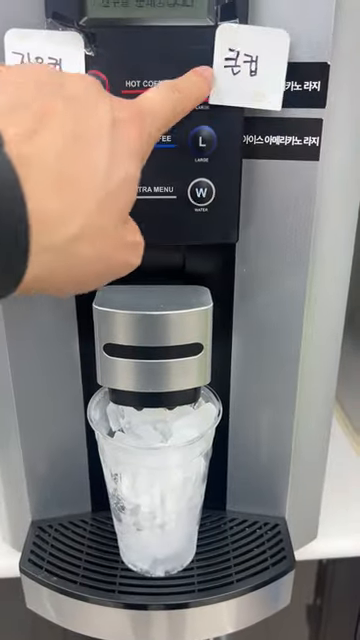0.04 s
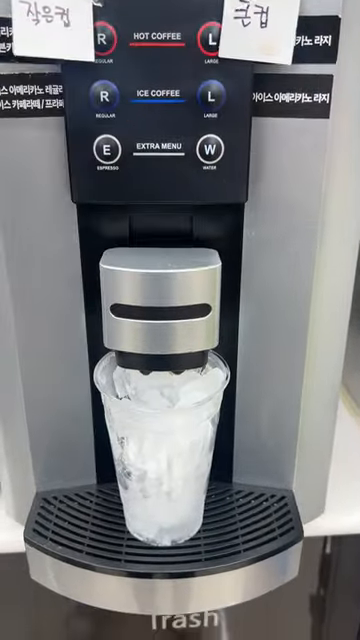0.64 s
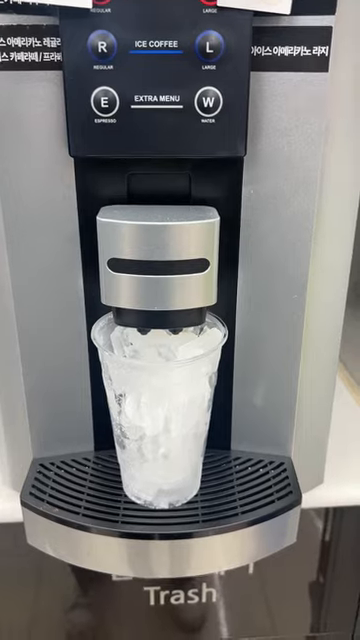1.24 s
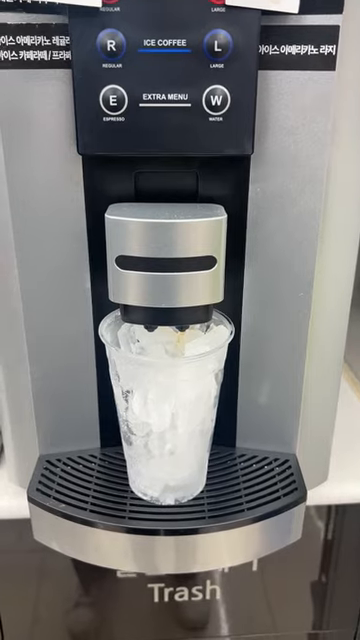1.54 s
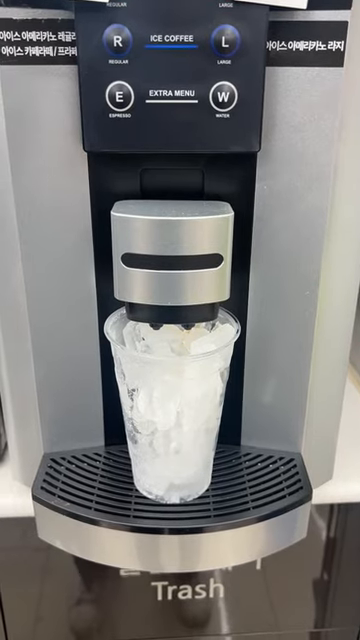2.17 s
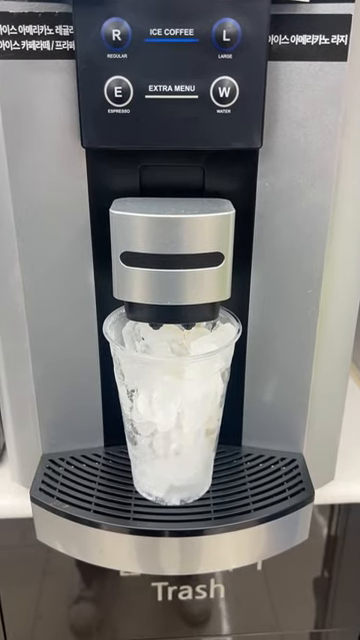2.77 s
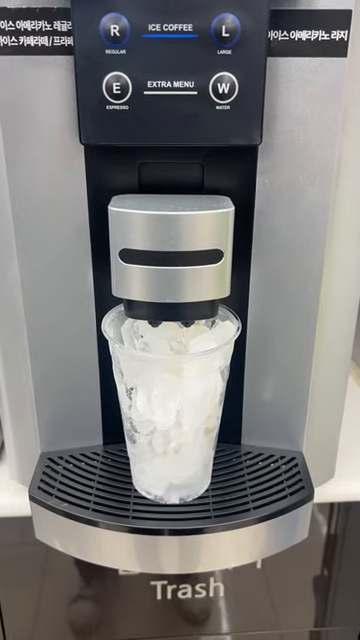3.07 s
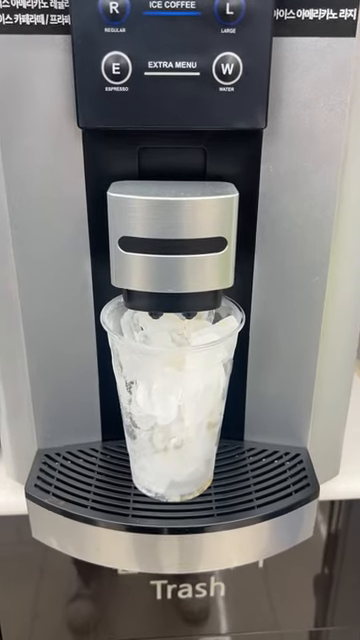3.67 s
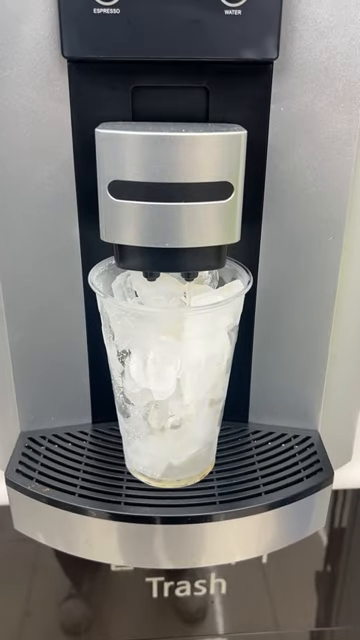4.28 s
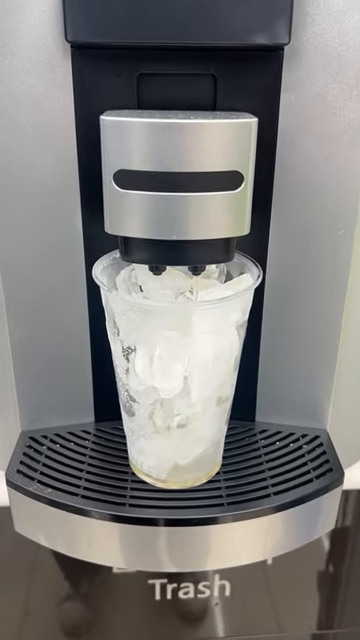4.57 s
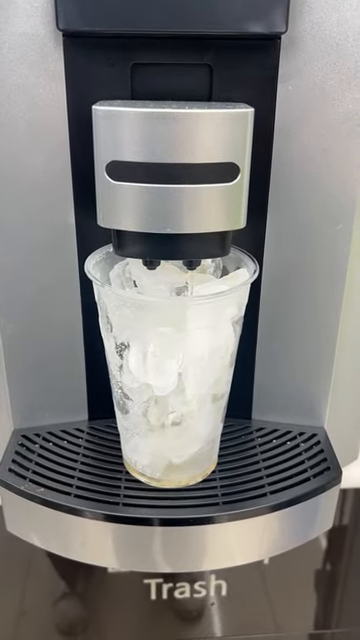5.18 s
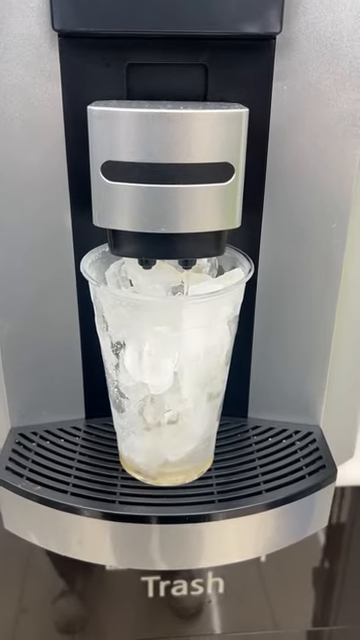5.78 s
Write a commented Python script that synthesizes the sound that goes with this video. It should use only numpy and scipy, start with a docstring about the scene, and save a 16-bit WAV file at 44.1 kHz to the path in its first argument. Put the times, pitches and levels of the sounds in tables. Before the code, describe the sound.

A coffee machine hums and hisses while filling a cup of ice, which cracks faintly, and something bangs twice farther off.

```python
"""Coffee dispensed over ice.

A coffee machine hums, churns and hisses as it fills a plastic cup of ice, close to the microphone.
A small motor whines with a wandering pitch. The ice cracks, fizzes and clinks once in the coffee.
Farther off something heavy, like a door or a lid, bangs twice and the shop answers."""
import sys
import numpy as np
from scipy.fft import rfft, irfft, next_fast_len
from scipy.io import wavfile
from scipy.ndimage import map_coordinates

SR = 44100
rng = np.random.default_rng(int(sys.argv[2]) if len(sys.argv) > 2 else 0)


def materialize(psi):
    """Save the field psi as 16-bit PCM at rate SR to the path in sys.argv[1].

    A 1-D psi becomes a single channel; in a 2-D psi each row is a channel.
    """
    bounded = np.clip(np.atleast_2d(psi).T, -1, 1)
    quanta = np.round(bounded * 32767).astype(np.int16)
    wavfile.write(sys.argv[1], SR, quanta)


N = 256662

# Noise spectra. Each row: frequency in Hz, relative density in dB.
RUMBLE_SPECTRUM = [(20, -21), (35, -23), (48, -3), (65, -4), (100, -4), (170, -1), (260, -2), (400, -11.5),
                   (900, -29.5), (2000, -84)]
CHURN_SPECTRUM = [(100, -65), (250, -9.5), (340, 1.5), (480, -2.5), (700, -0.5), (800, -7.5), (1000, -16.5),
                  (1250, -14), (1550, -24.5), (2200, -19), (5000, -76)]
HISS_SPECTRUM = [(300, -21), (1000, 5.5), (1550, -7.5), (1850, -2.5), (2300, -0.5), (2850, -3.5),
                 (3300, -2), (3900, -4), (4500, -1), (5300, -4.5), (5700, -1.5), (6300, -1), (6600, -4.5),
                 (7100, -3), (7500, -3.5), (8000, -2), (8400, -4.5), (9500, -6.5), (13300, -6.5),
                 (16000, -14)]
THUD_SPECTRUM = [(30, -26), (80, -15), (150, 0.5), (300, -1.5), (480, -2), (700, -3), (1100, -3.5),
                 (1400, -15), (1700, -31), (3000, -48), (8000, -57)]
CLATTER_SPECTRUM = [(200, -20), (800, -2), (1600, 0), (2600, -1), (4000, -4.5), (5300, -2), (8000, -13.5),
                    (12000, -15), (16000, -50)]
CRACK_SPECTRUM = [(300, -2), (900, 6), (1500, -1), (2200, 9.5), (3000, 7.5), (4700, -2), (6000, 0),
                  (7300, -3.5), (8200, -11), (12000, -4.5), (16000, -22)]
FIZZ_SPECTRUM = [(1000, -20), (4000, -5), (6000, 0.5), (8000, 2), (10000, -4.5), (16000, -11.5)]
# Stereo width. Each row: frequency in Hz, side minus mid in dB.
STEREO_WIDTH = [(60, -40), (110, -23), (200, -43), (380, -9), (650, -2.5), (900, 2), (1250, -1.5),
                (1800, -4.5), (2400, 2.5), (2950, 3), (3500, -2), (4250, -4), (5050, 3), (5700, -6.5),
                (6700, -27), (7800, -8), (9800, -0.5), (12000, 5.5), (13500, 38)]
# Microphone balance. Each row: frequency in Hz, left minus right in dB.
MIC_BALANCE = [(130, 0), (330, -2.5), (550, 0.8), (1000, 3.1), (3000, 0)]

# Blows within the two bangs. Each row: start in seconds, thud in dB, clatter in dB,
# thud rise in seconds, T60 in seconds, note in Hz, note in dB re the thud.
BLOWS = [(0, -28, -33.5, 0.0036, 0.77, 478, -8), (0.016, -27, -34, 0.0027, 0.24, 224.7, -7),
         (2.478, -23.5, -37, .009, 0.67, 590, -9), (2.506, -17.5, -27, .003, 0.11, 648, -5),
         (2.513, -24, -33, 0.0028, 0.073, 1060, -2.5), (2.523, -22, -39, 0.0043, 0.15, 307, 6.5),
         (2.527, -25, -46, 0.0025, 0.12, 465, 6), (2.54, -19.5, -43, 0.0026, 0.076, 242, 4),
         (2.586, -30.5, -49, .004, 0.34, 558, -4), (2.719, -27.5, -45, 0.0037, 0.15, 260, -2),
         (2.745, -29.5, -44, .003, 0.16, 590, -2.5)]
# Latch clacks. Each row: start in seconds, level in dB, T60 in seconds.
LATCH_CLACKS = [(0, -33, 0.37), (.028, -35.5, 0.3), (2.519, -39, .15)]
# Modes of the struck hollow body and the latch. Each row: frequency in Hz, width in Hz, gain in dB.
BODY_RESONANCES = [(145, 23, 5), (220, 59, 3), (298, 34, 4), (450, 130, 3.5), (680, 120, -2),
                   (846, 23, -1.5), (1155, 18, -1), (1390, 29, 1), (1560, 20, 15)]
LATCH_RESONANCES = [(1270, 120, -9), (1590, 88, 0), (1830, 140, -7), (4100, 110, -8), (4870, 150, -6.5)]

# Mains and motor lines. Each row: frequency in Hz, level in dB, sway in dB.
HUM_LINES = [(46.9, -56.5, -1), (59.8, -46.5, 3.5), (73.8, -49.5, 3), (93.7, -44, 3), (119.37, -32, 1),
             (158.7, -49, 8.5), (301.3, -48.5, 2), (358.7, -53, 3.5)]
# Narrow noisy bands: panels shaken by the pump, and a buzz at the motor's shaft rate near 226 Hz. Each row:
# frequency in Hz, nominal width in Hz, level in dB.
NARROW_BANDS = [(119.7, 20, -42), (226.6, 13.3, -44.5), (507, 14, -51)]
# Pump under load. Each row: start in seconds, end in seconds, level in dB.
PUMP_LOADS = [(-.1, 0.498, -37), (1.347, 1.707, -36), (1.799, 2.456, -39), (2.7, 4.15, -36.5),
              (4.4, 5.9, -36.5)]
# Motor whine. Each row: time in seconds, pitch in Hz.
WHINE_PITCH = [(0, 1797), (.22, 1810), (.4, 1856), (.52, 1843), (.68, 1855), (.86, 1789), (1.08, 1823),
               (1.4, 1756), (1.57, 1804), (1.66, 1742), (1.9, 1799), (2.1, 1759), (2.42, 1824),
               (2.64, 1754), (2.86, 1816), (3.08, 1814), (3.18, 1845), (3.3, 1810), (3.55, 1810),
               (3.85, 1765), (4.1, 1797), (4.87, 1756), (5.25, 1778), (5.55, 1751), (5.82, 1770)]
# Multiples of the shaft rate, and the gain of each in dB re the whine level.
MOTOR_ORDERS = (2, 4, 5, 6, 7, 8)
ORDER_GAINS_DB = [6, 1.5, -5.5, -3.5, -7, 1]
# Levels of motor, cabinet water and spout stream. Each row: time in seconds, relative level in dB.
WHINE_ENVELOPE = [(0, -58.5), (.6, -59), (1.1, -57), (1.5, -63), (2.3, -62), (3.2, -58.5), (3.9, -63),
                  (5.82, -61.5)]
CHURN_ENVELOPE = [(0, -44), (1.08, -47.5), (1.25, -43.5), (2.3, -45), (2.9, -46.5), (4.3, -45),
                  (5.82, -45.5)]
HISS_ENVELOPE = [(.25, -53.5), (.85, -51.5), (1.2, -53.5), (2.35, -52), (2.9, -53.5), (3.25, -52),
                 (4.05, -53.5), (4.45, -52), (5.82, -52)]

# Air leaving the ice. Each row: start in seconds, level in dB, T60 in seconds.
AIR_SPURTS = [(.465, -45, 0.32), (.88, -43, 0.12), (1.053, -37.5, 0.15), (2.205, -34, 0.039),
              (2.41, -43.5, .26), (3.698, -35, .02), (4.624, -37.5, 0.079), (4.831, -41.5, .081),
              (4.978, -43, 0.4), (5.695, -40.5, 0.22)]
# Modes of two touching cubes. Each row: frequency in Hz, level in dB, T60 in seconds.
CUBE_MODES = [(1280, -37.5, 0.05), (5960, -29, 0.039), (8470, -39, 0.021), (15130, -46, .03)]
# Modes of the filled cup. Each row: frequency in Hz, level in dB re the knock.
CUP_RESONANCES = [(1351, -17), (2051, -12), (2805, -15), (3596, -16), (4156, -15.5), (5335, -16)]
# Ice cracks. Each row: start in seconds, relative level in dB, ring in Hz, ring offset in dB,
# ring T60 in seconds.
ICE_CRACKS = [(.363, -39.5, 2280, 10.5, .04), (2.207, -30, 7750, -8, .03), (3.184, -23, 2700, -2, .016),
              (3.222, -26, 2270, 10, 0.023), (3.279, -29, 2130, -3, 0.041), (3.342, -27.5, 2350, 2, .015),
              (3.424, -27.5, 3500, -16, .03), (3.6985, -17, 2830, -5, 0.031), (3.703, -20, 3560, -4, .02),
              (3.867, -28.5, 3420, -4, 0.032), (3.942, -27.5, 2220, -5, .02), (4.053, -32, 3300, -5, .02),
              (4.068, -29, 2350, 0, 0.031), (4.307, -28, 2190, -8, .025), (5.044, -32.5, 2600, -4, .012),
              (5.075, -30, 2170, -2, .012), (5.0795, -31, 3950, 1, .014), (5.1097, -30, 3100, 1, .014),
              (5.1236, -33, 2130, 8, .014), (5.148, -35, 2240, -2, .014), (5.176, -26.5, 2150, 5, .011),
              (5.1806, -27, 3050, -3, .012), (5.190, -35, 2220, 4, 0.037), (5.576, -31.5, 2510, -3, .02)]


def amp(db):
    """Decibels to gain."""
    return 10 ** (np.asarray(db) / 20)


def gain_at(spectrum, hz):
    """Gain from (Hz, dB) points on a log frequency axis."""
    knots_hz, db = np.transpose(spectrum)
    return amp(np.interp(np.log(hz + 1), np.log(knots_hz + 1), db))


def curve(points):
    """One value per sample from (seconds, value) points."""
    return np.interp(np.arange(N) / SR, *np.transpose(points))


def wobble(rate_hz):
    """Smooth random curve, rms near 1."""
    knots = rng.standard_normal(int(N * rate_hz / SR) + 4)
    return map_coordinates(knots, [np.arange(N) * rate_hz / SR])


def filtered(x, response):
    """Apply a frequency response."""
    size = next_fast_len(N + SR // 4)
    return irfft(rfft(x, size) * response(np.fft.rfftfreq(size, 1 / SR)), size)[..., :N]


def resonance(hz, centre_hz, width_hz):
    """Response of one damped mode."""
    return 1j * hz * width_hz / (centre_hz ** 2 - hz ** 2 + 1j * hz * width_hz)


def ripple(hz, depth_db):
    """Nearby walls comb a spectrum into narrow peaks and dips."""
    knots = rng.standard_normal(1024)
    return amp(depth_db * map_coordinates(knots, [hz / 55], mode='mirror'))


def noise(response):
    """Stereo noise of rms 1: narrow in the bass, mostly wide above."""
    def mid_side(hz):
        angle = np.arctan(gain_at(STEREO_WIDTH, hz))
        return response(hz) * np.array([np.cos(angle), np.sin(angle)])
    mid, side = filtered(rng.standard_normal((2, N)), mid_side)
    stereo = np.array([mid + side, mid - side])
    return stereo / np.sqrt(np.mean(stereo ** 2) + 1e-20)


def rush(spectrum):
    """Stereo noise shaped by (Hz, dB) points."""
    return noise(lambda hz: gain_at(spectrum, hz))


def burst(start_s, t60_s, rise_s):
    """Envelope with exponential rise and decay."""
    age_s = np.maximum(np.arange(N) / SR - start_s, 0)
    return (1 - np.exp(-age_s / rise_s)) * np.exp(-np.log(1000) * age_s / t60_s)


def tone(hz):
    """Sine of rms 1 along a pitch curve."""
    return np.sqrt(2) * np.sin(2 * np.pi * (np.cumsum(hz) / SR + rng.random()))


def bangs():
    """Each blow booms in a hollow body, rings one note and rattles; the shop's echo prolongs it."""
    def body(f):
        modes = (amp(db) * resonance(f, hz, width_hz) for hz, width_hz, db in BODY_RESONANCES)
        return np.sqrt(sum(np.abs(mode) ** 2 for mode in modes))
    boom = noise(lambda f: gain_at(THUD_SPECTRUM, f) * (0.87 + body(f)))
    clatter = noise(lambda f: gain_at(CLATTER_SPECTRUM, f) * ripple(f, depth_db=2.2))
    thud_power, clatter_power, notes = np.zeros((3, N))
    for start_s, thud_db, clatter_db, rise_s, t60_s, hz, note_db in BLOWS:
        strike = burst(start_s, t60_s, rise_s)
        thud_echo = 0.13 * burst(start_s, 0.71, 0.0062) ** 2
        clatter_echo = 0.28 * burst(start_s, 0.82, 0.0058) ** 2
        thud_power += amp(thud_db) ** 2 * (strike ** 2 + thud_echo)
        clatter_power += amp(clatter_db) ** 2 * (burst(start_s, t60_s, rise_s / 2) ** 2 + clatter_echo)
        notes += amp(thud_db + note_db) * strike * tone(hz * (1 + 0.0296 * wobble(150)))
    pan_right = amp([[-0.8], [0.8]])
    return (np.sqrt(thud_power) * boom + notes) * pan_right + np.sqrt(clatter_power) * clatter


def latch():
    """Something hard, like a latch, clacks with the bangs and chatters in its own resonances."""
    def modes(f):
        return sum(amp(db) * np.abs(resonance(f, hz, width_hz)) ** 2
                   for hz, width_hz, db in LATCH_RESONANCES)
    clacks = sum(amp(db) * burst(start_s, t60_s, 0.0013) for start_s, db, t60_s in LATCH_CLACKS)
    return clacks * noise(modes)


def hum(pump_hz=180.4, idle_db=-47, ramp_s=0.05, pump_sway_db=1.5):
    """Mains-driven motors drone and shake the cabinet's panels; the pump swells under load."""
    lines = sum(amp(db + sway_db * wobble(6)) * tone(hz + 0.32 * wobble(2.966))
                for hz, db, sway_db in HUM_LINES)
    t = np.arange(N) / SR
    load = sum(amp(db) * np.clip(np.minimum(t - start_s, end_s - t) / ramp_s, 0, 1)
               for start_s, end_s, db in PUMP_LOADS)
    pump_gain = np.maximum(load, amp(idle_db)) * amp(pump_sway_db * wobble(9.7))
    pump = pump_gain * tone(pump_hz + 0.5 * wobble(5.12))
    panels = sum(amp(db) * noise(lambda f: resonance(f, hz, 1.7 * width_hz) ** 2)
                 for hz, width_hz, db in NARROW_BANDS)
    return lines + pump + panels + amp(-38.5) * rush(RUMBLE_SPECTRUM)


def motor(whine_order=8, shaft_boost_db=19.5):
    """A small motor of wandering speed hums at its shaft rate and whines on the multiples."""
    level_db = curve(WHINE_ENVELOPE)
    shaft_hz = (curve(WHINE_PITCH) + 7 * wobble(12) + 3 * wobble(40)) / whine_order
    overtones = sum(amp(db + 1.7 * wobble(16)) * tone(order * shaft_hz)
                    for order, db in zip(MOTOR_ORDERS, ORDER_GAINS_DB))
    shaft = amp(shaft_boost_db + 1.33 * wobble(9)) * tone(shaft_hz)
    return amp(level_db) * (overtones + shaft)


def brewing(sizzle_db_per_db=1.1):
    """Water churns in the cabinet; the spout hisses, with a whistling sizzle that grows with the flow."""
    flow_db = curve(HISS_ENVELOPE) + 0.95 * wobble(7.7)
    churn_gain = amp(curve(CHURN_ENVELOPE) + 5.5 + 0.91 * wobble(14))
    churn = noise(lambda f: gain_at(CHURN_SPECTRUM, f) * ripple(f, depth_db=1))
    hiss = noise(lambda f: gain_at(HISS_SPECTRUM, f) * ripple(2 * f, depth_db=2.83))
    sizzle = noise(lambda f: resonance(f, 5860, 810) ** 2 + resonance(f, 5955, 90) ** 2)
    sizzle_db = -15 + sizzle_db_per_db * (flow_db - flow_db.mean()) + 1.6 * wobble(5.07)
    grain_db = 0.74 * wobble(120)
    return churn_gain * churn + amp(flow_db + 9 + grain_db) * (hiss + amp(sizzle_db) * sizzle)


def fizz(tick_count=60):
    """Trapped air leaves the melting ice in spurts and tiny random ticks."""
    spurts = sum(amp(db) * burst(start_s, t60_s, 0.00082) for start_s, db, t60_s in AIR_SPURTS)
    ticks = sum(amp(-47 + 6 * size) * burst(when * N / SR, 0.015, 0.0002)
                for when, size in rng.random((tick_count, 2)))
    flicker = amp(4.8 * wobble(600))
    return (spurts + ticks) * flicker * rush(FIZZ_SPECTRUM)


def clink(start_s=1.0525, blur_hz=130):
    """Two cubes touch and ring with a short, dry, bright note."""
    return sum(amp(db) * burst(start_s, t60_s, 0.0005) * tone(hz + blur_hz * wobble(900))
               for hz, db, t60_s in CUBE_MODES)


def ice_cracks(snap_t60_s=0.011, cup_t60_s=0.031, max_settle_s=0.058):
    """A cube snaps, sounds its own brief note, rings the cup, leaves a faint echo and settles."""
    snaps, knocks, echoes, settling, rings = np.zeros((5, N))
    waits_s = max_settle_s * rng.random(len(ICE_CRACKS))
    for (start_s, db, hz, ring_db, t60_s), wait_s in zip(ICE_CRACKS, waits_s):
        snaps += amp(db - 1.5) * burst(start_s, snap_t60_s, 0.00051)
        knocks += amp(db - 7.5) * burst(start_s, cup_t60_s, 0.00035)
        echoes += amp(db - 23.5) * burst(start_s, 0.25, 0.004)
        settling += amp(db - 17) * burst(start_s + wait_s, 0.016, 0.00046)
        note = tone(hz * (1 + 0.027 * wobble(700)))
        rings += amp(db + ring_db - 9) * burst(start_s, t60_s, 0.00042) * note
    cup = sum(amp(db + wobble(18)) * tone(hz * (1 + 0.015 * wobble(500))) for hz, db in CUP_RESONANCES)
    crackle = (snaps + echoes + settling) * amp(-0.5) * rush(CRACK_SPECTRUM)
    pan_left = amp([[0.8], [-0.8]])
    return (crackle + knocks * cup + rings) * pan_left


def scene():
    """The machine, the shop and the cup."""
    return hum() + motor() + brewing() + bangs() + latch() + ice_cracks() + clink() + fizz()


def record(dry, top_hz=15800):
    """Two band-limited microphones, slightly different in colour."""
    half_each_way = np.array([[0.5], [-0.5]])
    return filtered(dry, lambda hz: gain_at(MIC_BALANCE, hz) ** half_each_way * (hz < top_hz))


dry = scene()
out = record(dry)
materialize(out)
```